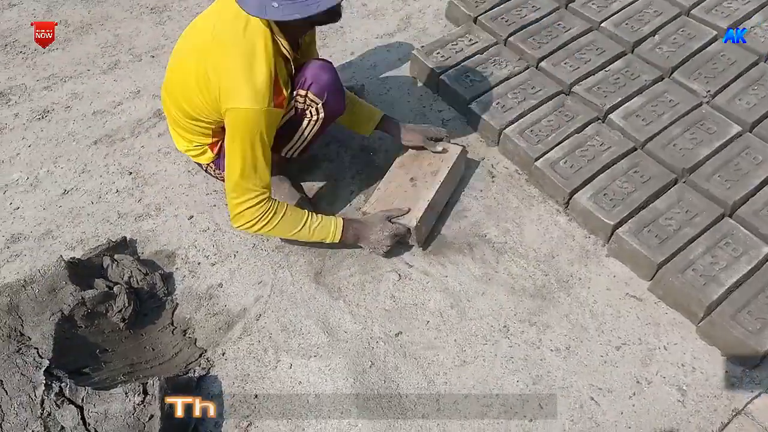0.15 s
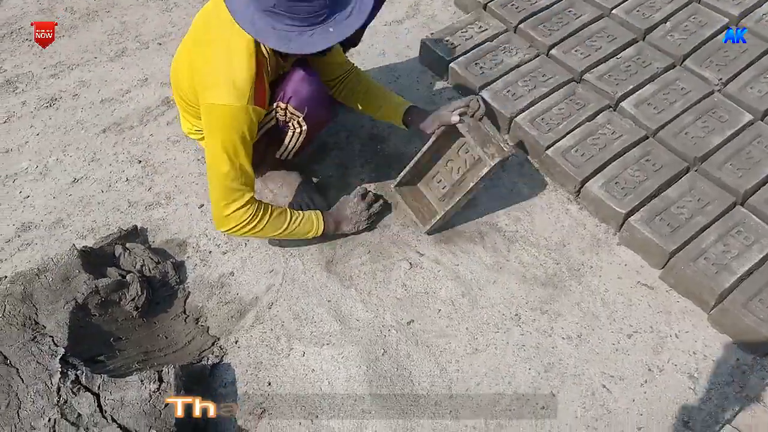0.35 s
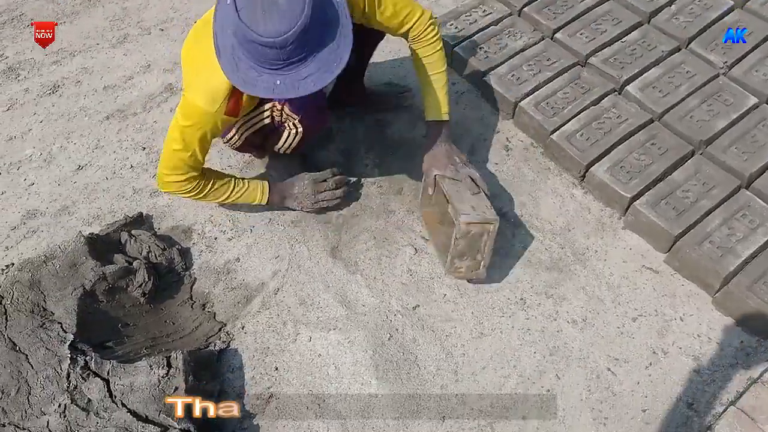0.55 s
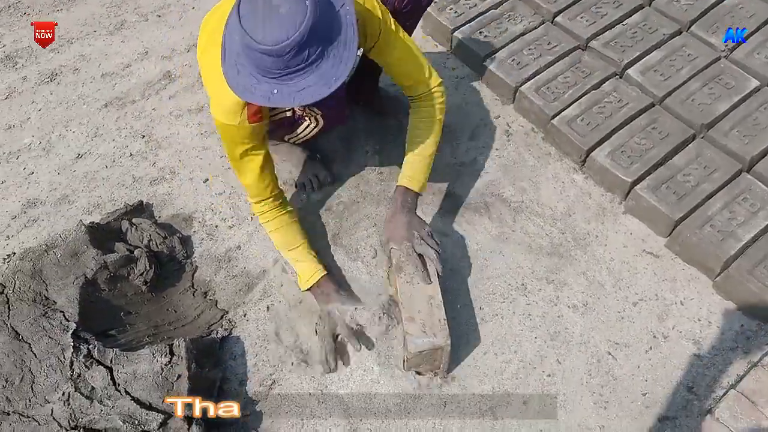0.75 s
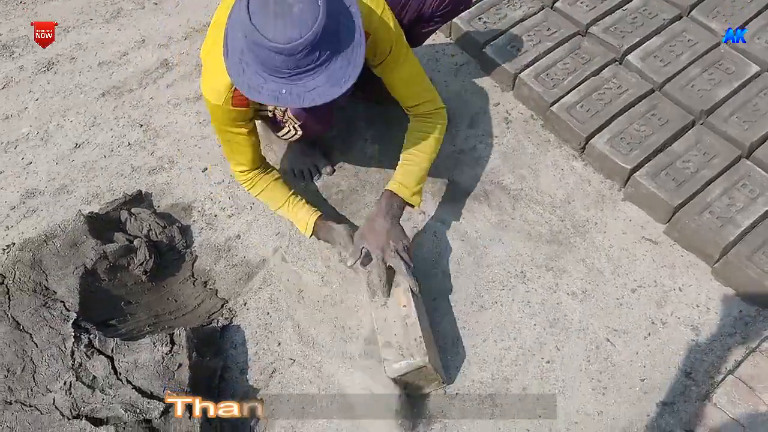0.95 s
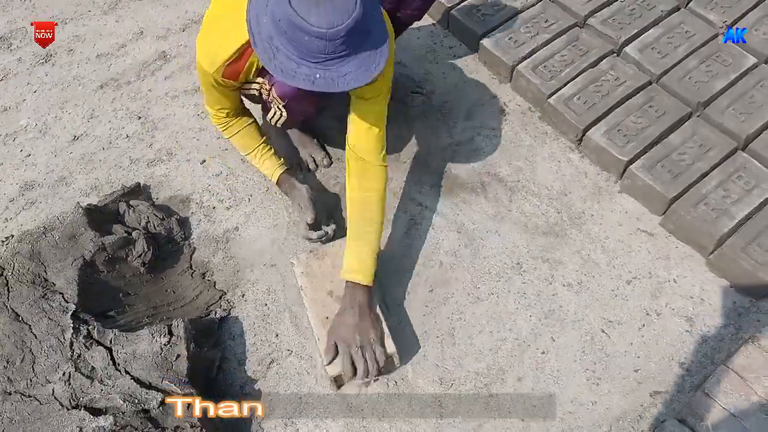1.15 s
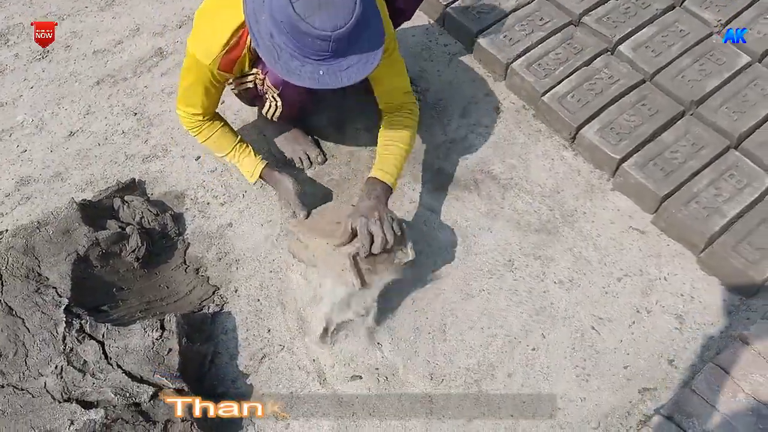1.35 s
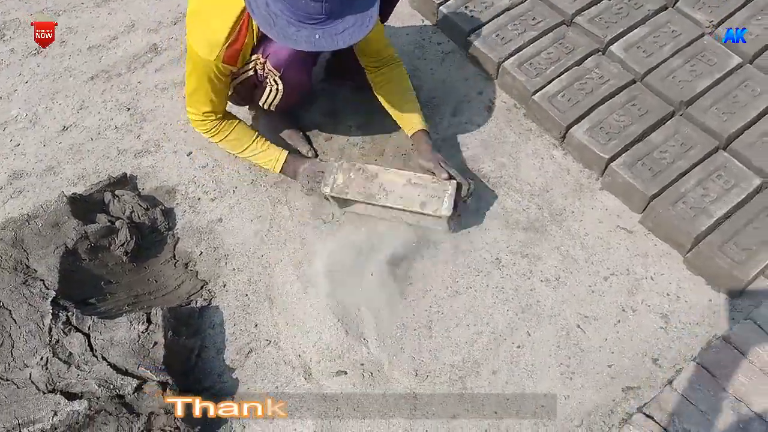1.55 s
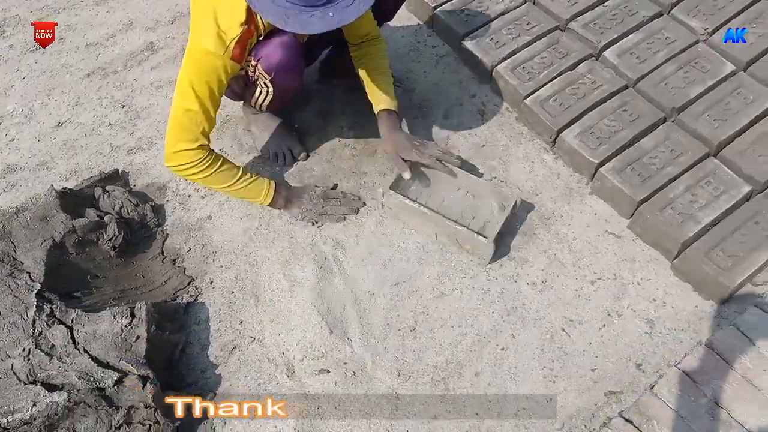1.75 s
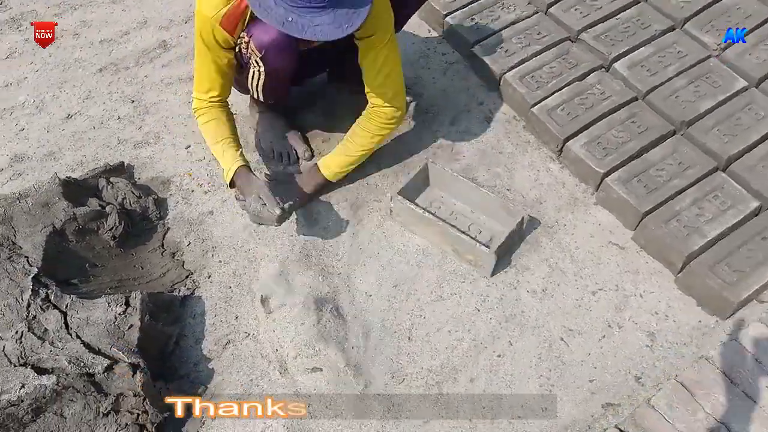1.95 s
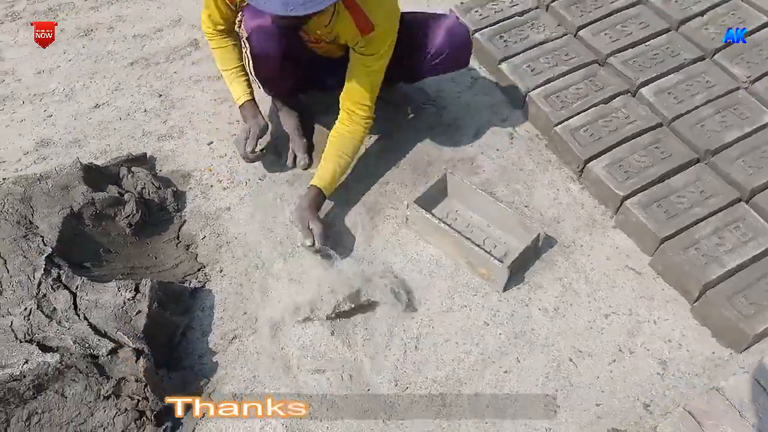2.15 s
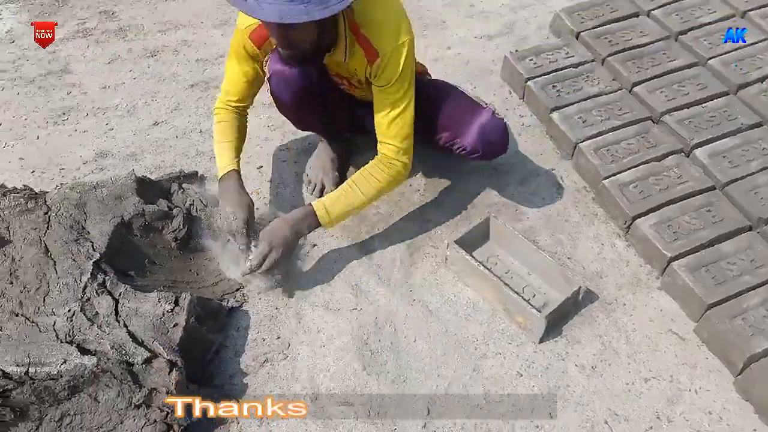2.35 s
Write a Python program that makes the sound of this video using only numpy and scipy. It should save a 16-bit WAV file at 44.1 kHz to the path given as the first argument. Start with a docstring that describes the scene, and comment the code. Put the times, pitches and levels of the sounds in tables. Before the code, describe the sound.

An empty wooden mould gives one loud, hollow thump on sandy ground, then short gritty scrapes, quieter knocks as it is turned and set down, and faint hand rustles; close microphone, open yard, low distant engine hum.

```python
"""An empty wooden brick mould is knocked on sandy ground, rubbed through the sand, turned and set down.
Each blow adds a thud (a fading low tone), a ring (several fading tones) and a crunch (fading noise).
Shaped noise makes the sand hiss and the open air; gliding tones squeak, scuff or bump; tiny snaps crackle.
Steady low tones hum like a distant engine, and the yard returns a faint, dull echo of the blows."""
import sys
import numpy as np
from scipy import signal
from scipy.io import wavfile

SR = 44100
rng = np.random.default_rng(int(sys.argv[2]) if len(sys.argv) > 2 else 0)


def wav_record(signal):
    """Record a signal, one row per channel, as 16-bit PCM in the file named by sys.argv[1]."""
    frames = np.transpose(np.atleast_2d(signal))
    bounded = np.clip(frames, -1, 1)
    # unit amplitude maps onto the largest positive 16-bit level
    quanta = np.round(bounded * 32767).astype(np.int16)
    wavfile.write(sys.argv[1], SR, quanta)


N = 110250
T = np.arange(N) / SR  # time in seconds

# Sand rubbed by box and hands. Each row: time in seconds, scrape level in dB, fine hiss level in dB.
RUBBING = [(0, -69, -79.5), (.16, -63, -70.5), (0.209, -67.5, -84), (0.359, -73, -82), (.43, -62.5, -77),
           (.52, -68, -79.5), (.58, -58.5, -74), (0.759, -59, -69.5), (0.815, -44, -60.5),
           (.93, -57, -73.5), (1.11, -54, -74.5), (1.19, -66, -82.5), (1.269, -57, -66),
           (1.361, -59.5, -73), (1.439, -69, -86.5), (1.81, -61, -76), (1.858, -59.5, -68),
           (2.011, -66, -89), (2.06, -61.5, -76), (2.33, -61, -75.5), (2.5, -67, -84)]
# Tone colour of the scrape. Each row: frequency in Hz, relative level in dB per Hz.
SCRAPE_COLOUR = [(200, -12), (400, -5.5), (700, 4), (1300, 2), (2200, 10.5), (3000, 1.5), (4000, -6),
                 (4800, -35), (15000, -40)]
# Tone colour of the fine hiss. Each row: frequency in Hz, relative level in dB per Hz.
HISS_COLOUR = [(1500, -14.5), (3500, -1), (7000, 3), (9000, -3), (12000, -13.5), (15000, -11)]
GRAIN_DB, GRAINS_PER_S = 2.5, 350  # random unevenness of the rubbing

# Steady tones of the engine. Each row: frequency in Hz, rms level in dB before panning.
HUM = [(61.3, -64.5), (81.3, -48.5), (123.7, -60)]
HUM_WANDER_RAD = 0.066  # phase wander of the second tone; the others scale with frequency

# Tone colour of the open air. Each row: frequency in Hz, relative level in dB per Hz.
AIR_COLOUR = [(25, -14.5), (115, 2), (180, 3), (300, -7.5), (550, -13), (2100, -22), (2650, -10.5),
              (3400, -37), (5000, -36.5), (15000, -52)]
AIR_DB = -58.5

# Frequencies in Hz at which the strength of a blow is given.
STRENGTH_HZ = [380, 580, 730, 1400, 2400, 7000]
# Blows of the mould. Each row: start in seconds, thud frequency in Hz, thud peak in dB before panning,
# then the strength of ring and crunch in dB at each of STRENGTH_HZ.
BLOWS = [(0.2095, 202, -2.5, -15, -14, -4, -22.5, -30.5, -46.5),
         (0.424, 200, -54, -43.5, -62, -53.5, -67.5, -49.5, -76),
         (0.484, 253, -35, -48, -69, -52, -60, -90, -80),
         (0.73, 308, -33.5, -33.5, -40, -45.5, -44.5, -52, -62.5),
         (0.793, 195, -70, -47, -64, -51, -39, -41, -67.5),
         (1.001, 197, -56, -52, -63.5, -58, -53, -44.5, -65),
         (1.1702, 261, -25.5, -30.5, -51, -50.5, -51.5, -55, -100),
         (1.182, 275, -23.5, -29.5, -39, -78, -75, -77, -80),
         (1.209, 410, -53, -39, -45, -74, -75, -70, -82),
         (1.2232, 168, -33, -45, -66, -66, -79, -56.5, -71),
         (1.2839, 198, -35, -40.5, -47, -36.5, -38.5, -40.5, -72),
         (1.5617, 257, -18, -29, -44, -37.5, -39.5, -44.5, -50),
         (1.5691, 230, -30, -16.5, -43.5, -50, -39.5, -75.5, -64.5),
         (1.785, 302, -31.5, -38.5, -26, -33, -35, -42, -44),
         (1.8175, 310, -35, -42, -17.5, -33, -37.5, -48, -56),
         (1.8513, 227, -38.5, -50, -65, -60, -53, -59, -72),
         (1.886, 290, -34.5, -39.5, -24.5, -48, -57, -58, -66),
         (1.9446, 254, -48, -37, -31, -44.5, -39, -59, -68),
         (2.447, 260, -38, -43, -36.5, -79, -65, -58, -69)]
# Ringing tones (modes) of the wooden box. Each row: frequency in Hz before any detuning,
# level in dB relative to the blow's strength, time to fade by 60 dB in seconds.
BOX_MODES = [(367.2, -1, 0.11), (396, -2.5, 0.085), (483, -2.5, 0.067), (593, -19, 0.18),
             (636, -5.5, 0.073), (718, -1.5, 0.067), (833, -13.5, 0.06), (1047, -7.5, 0.06),
             (1317, -11.5, 0.079), (1521.6, -5.5, 0.06), (1990, -10.5, 0.076), (2166, -1, 0.056),
             (2930, -5.5, 0.0461)]
MODE_RISE_CYCLES, GRIP_DETUNE, GRIP_ABOVE_HZ = 1, 0.0077, 800  # detune is a fraction of the frequency
THUD_RISE_S, THUD_FADE_CYCLES, THUD_LOW_HZ = 0.00252, 0.47, 108
# Left-right balance of the blows. Each row: frequency in Hz, left minus right in dB.
BLOW_PAN = [(250, 1.05), (700, 0.5), (1400, 5), (4000, -5)]

# Grit crushed in each blow. Each row: frequency in Hz, level in dB relative to the blow's strength,
# time to fade by 60 dB in seconds.
CRUNCH = [(448.5, -6, 0.045), (818, -5, 0.056), (1340, -2.5, 0.032), (2478, -1, 0.059), (3820, -2, 0.036),
          (5200, -5, 0.012), (7000, -4.5, 0.038), (10960, -24.5, 0.018)]
CRUNCH_RISE_S, CRUNCH_LIKENESS = 0.0011, 0.53  # likeness: 0 is unrelated ears, 1 is identical ears

# Faint echo of the blows.
YARD_DB, YARD_T60_S, YARD_RISE_S, YARD_LOW_HZ, YARD_HIGH_HZ = -35.5, 0.21, 0.0053, 215, 580

# Squeaks, scuffs and soft low bumps. Each row: start in seconds, length in seconds, start frequency in Hz,
# end frequency in Hz, width in Hz (random changes per second), rms level in dB before fading in and out.
SQUEAKS_AND_BUMPS = [(.638, 0.018, 309, 282.5, 250, -47), (1.244, 0.039, 2750, 3076, 490, -52),
                     (1.325, 0.071, 1182, 1014, 179, -59), (2.038, 0.021, 277, 257, 197, -48),
                     (2.23, 0.029, 600, 340, 604, -51), (2.362, 0.06, 786, 842, 902, -55)]

# Crumbs crackling close by the hands. Each row: start in seconds, length in seconds,
# rms level in dB before panning, left minus right in dB.
CRUMBS = [(2.228, 0.031, -66, 14), (2.4286, 0.0038, -57.5, -10)]
SNAPS_PER_S, SNAP_LOW_HZ, SNAP_HIGH_HZ = 2200, 6050, 10000
TICK_AT_S = 2.431
# Ringing tones of one grain of stone. Each row: frequency in Hz, level in dB,
# time to fade by 60 dB in seconds.
TICK = [(6100, -43.5, 0.014), (7080, -41.5, 0.011)]

# The two ears. Each row: frequency in Hz, likeness of the ears from 0 to 1, left minus right in dB.
STEREO = [(203, 0.95, 1), (933, 0.51, 3), (2400, 0.151, -4.5), (6020, 0.0877, -3), (14000, 0.077, 7.5)]
STOP_HZ = 16600  # from here up the sound is cut by at least 60 dB


def amp(db):
    """Turn decibels into a plain multiplier."""
    return 10 ** (np.asarray(db) / 20)


def rms_one(x):
    """Scale a sound so that its rms (average strength) is 1."""
    return x / np.sqrt(np.mean(x ** 2) + 1e-20)


def at_hz(rows, hz, axis=1):
    """Read one column of a table between its rows, on a log-frequency axis."""
    rows = np.array(rows)
    return np.interp(np.log(hz), np.log(rows[:, 0]), rows[:, axis])


def pan(db):
    """Left and right multipliers for a level difference in dB."""
    return amp(np.array([[db], [-db]]) / 2)


def band(x, low_hz, high_hz):
    """Keep the sound between two frequencies, with gentle slopes."""
    sos = signal.butter(2, [low_hz, min(high_hz, .45 * SR)], "band", fs=SR, output="sos")
    return signal.sosfilt(sos, x)


def drift(rate):
    """Random wander: straight lines between random points, `rate` points a second."""
    knots = rng.standard_normal(int(N / SR * rate) + 2)
    return np.interp(T * rate, np.arange(len(knots)), knots)


def struck(t, rise_s, t60):
    """Loudness shape that swells quickly and fades by 60 dB in t60 seconds."""
    fade = np.exp(-np.log(1000) * t / t60)
    return (1 - np.exp(-t / rise_s)) * fade


def add(out, s, sound):
    """Mix a sound in, starting at s seconds."""
    i = int(s * SR)
    out[:, i:i + sound.shape[-1]] += sound[..., :N - i]


def noise_bands(likeness=None):
    """Split stereo noise into third-octave bands of rms 1: (centre Hz, band)."""
    edges = 22 * 2 ** (np.arange(30) / 3)
    white = rng.standard_normal((2, 2, N))
    for k, (low, high) in enumerate(zip(edges, edges[1:])):
        hz = np.sqrt(low * high)
        alike = np.clip(at_hz(STEREO, hz) if likeness is None else likeness, 0, 1)
        # Filter twice for steeper slopes; neighbouring bands take turns with two noises.
        low, high = low / 1.04, high * 1.04
        mid, side = band(band(white[k % 2], low, high), low, high)
        opposite = side * np.array([[1], [-1]])
        yield hz, rms_one(np.sqrt(1 + alike) * mid + np.sqrt(1 - alike) * opposite)


def coloured(spectrum):
    """Stereo noise of rms 1 whose bands follow a given tone colour."""
    total = np.zeros((2, N))
    for hz, x in noise_bands():
        # Wider bands hold more noise, hence the square root of the frequency.
        total += x * np.sqrt(hz) * amp(at_hz(spectrum, hz)) * pan(at_hz(STEREO, hz, axis=2))
    return rms_one(total)


def sand():
    """Rubbed grains make a rough scrape and a finer hiss that share the same fast unevenness."""
    s, scrape_db, hiss_db = np.transpose(RUBBING)
    grain_db = GRAIN_DB * drift(GRAINS_PER_S)
    scrape = coloured(SCRAPE_COLOUR) * amp(np.interp(T, s, scrape_db) + grain_db)
    hiss = coloured(HISS_COLOUR) * amp(np.interp(T, s, hiss_db) + grain_db)
    return scrape + hiss


def engine():
    """A distant engine hums as steady low tones whose phase wavers slightly."""
    lines = np.zeros(N)
    for hz, db in HUM:
        wander = HUM_WANDER_RAD * hz / HUM[1][0] * drift(12)
        lines += amp(db) * np.sin(2 * np.pi * (hz * T + rng.random()) + wander)
    return np.sqrt(2) * lines * pan(STEREO[0][2])  # root 2 turns rms into peak


def open_air():
    """Steady soft noise, strongest in the lows, fills the open yard."""
    return amp(AIR_DB) * coloured(AIR_COLOUR)


def strength_at(strength, hz):
    """Strength of one blow in dB at a frequency."""
    return at_hz(list(zip(STRENGTH_HZ, strength)), hz)


def thud(t, hz, db):
    """The ground gives a low tone that dies within a few cycles."""
    rise = (1 - np.exp(-t / THUD_RISE_S)) ** 2
    tone = rise * np.exp(-t * hz / THUD_FADE_CYCLES) * np.sin(2 * np.pi * hz * t)
    tone = signal.sosfilt(signal.butter(2, THUD_LOW_HZ, "high", fs=SR, output="sos"), tone)
    return amp(db) * tone / np.abs(tone).max() * pan(at_hz(BLOW_PAN, hz))


def ring(t, strength):
    """The box rings in its modes; where it lands sets their strength, and the grip detunes the upper ones."""
    sound = np.zeros((2, len(t)))
    for k, (hz, db, t60) in enumerate(BOX_MODES):
        # Neighbouring modes start in opposite directions; the two lowest are close and beat.
        gain = (-1) ** k * amp(db + strength_at(strength, hz))
        if hz > GRIP_ABOVE_HZ:
            hz = hz * (1 + GRIP_DETUNE * rng.standard_normal())
        tone = struck(t, MODE_RISE_CYCLES / hz, t60) * np.sin(2 * np.pi * hz * t)
        sound += gain * tone * pan(at_hz(BLOW_PAN, hz))
    return sound


def mould():
    """Each blow thuds on the ground and sets the wooden box ringing."""
    out, t = np.zeros((2, N)), T[:SR // 2]
    for s, thud_hz, thud_db, *strength in BLOWS:
        add(out, s, thud(t, thud_hz, thud_db) + ring(t, strength))
    return out


def crunch():
    """Grit crushed under each blow: a noise burst whose bands each fade at their own speed."""
    out, t = np.zeros((2, N)), T[:SR // 4]
    for hz, x in noise_bands(CRUNCH_LIKENESS):
        if hz <= 350:
            continue
        level = np.zeros((1, N))
        shape = struck(t, CRUNCH_RISE_S, at_hz(CRUNCH, hz, axis=2))
        for s, _, _, *strength in BLOWS:
            add(level, s, shape * amp(strength_at(strength, hz) + at_hz(CRUNCH, hz)))
        out += x * level * pan(at_hz(BLOW_PAN, hz))
    return out


def yard(x):
    """Ground and rows of bricks scatter the sound into a weak, dull, fading tail."""
    noise = rng.standard_normal((3, SR))
    dull = band(band(noise, YARD_LOW_HZ, YARD_HIGH_HZ), YARD_LOW_HZ, YARD_HIGH_HZ)
    shared, left, right = dull * struck(T[:SR], YARD_RISE_S, YARD_T60_S)
    tails = rms_one(shared + .5 * np.array([left, right])) / np.sqrt(SR)
    return amp(YARD_DB) * signal.fftconvolve(x, tails, axes=1)[:, :N]


def squeaks_and_bumps():
    """Squeaks, scuffs and soft low bumps: a rough gliding tone, swelling and fading."""
    out = np.zeros((2, N))
    for s, length, start_hz, end_hz, width_hz, db in SQUEAKS_AND_BUMPS:
        hz = np.linspace(start_hz, end_hz, int(length * SR))
        roughness = (drift(width_hz) + 1j * drift(width_hz))[:len(hz)]
        rough_tone = np.real(roughness * np.exp(2j * np.pi * np.cumsum(hz) / SR))
        add(out, s, amp(db) * np.hanning(len(hz)) * rms_one(rough_tone))
    return out


def crumbs():
    """Crumbs make short showers of random snaps, and one grain of stone rings."""
    out, t = np.zeros((2, N)), T[:SR // 20]
    for s, length, db, pan_db in CRUMBS:
        n = int(length * SR)
        snaps = rng.standard_normal(n) * (rng.random(n) < SNAPS_PER_S / SR)
        bright = band(snaps * np.hanning(n), SNAP_LOW_HZ, SNAP_HIGH_HZ)
        add(out, s, amp(db) * rms_one(bright) * pan(pan_db))
    for hz, db, t60 in TICK:
        add(out, TICK_AT_S, amp(db) * struck(t, 1 / hz, t60) * np.sin(2 * np.pi * hz * t))
    return out


def scene():
    """Blows and their scatter over sand, hum and open air, with squeaks, bumps and crumbs."""
    blows = mould() + crunch()
    background = sand() + engine() + open_air()
    return background + blows + yard(blows) + squeaks_and_bumps() + crumbs()


def record(dry):
    """Peaks beyond 0.95 are clipped flat, then the highest treble is cut."""
    treble_cut = signal.cheby2(12, 60, STOP_HZ, fs=SR, output="sos")
    return signal.sosfilt(treble_cut, np.clip(dry, -.95, .95))


dry = scene()
out = record(dry)
wav_record(out)
```